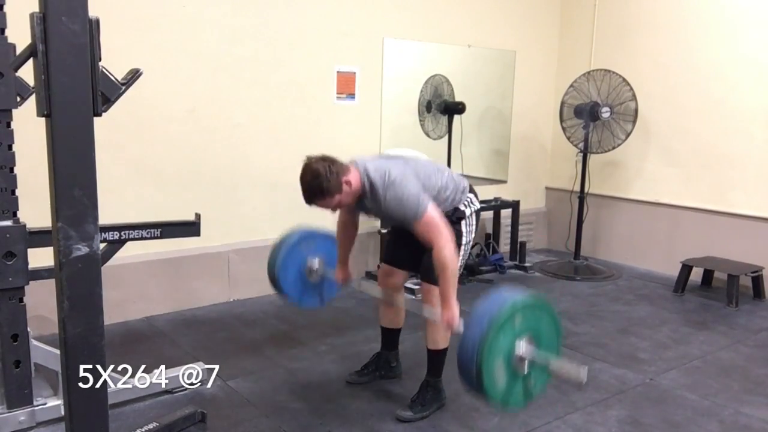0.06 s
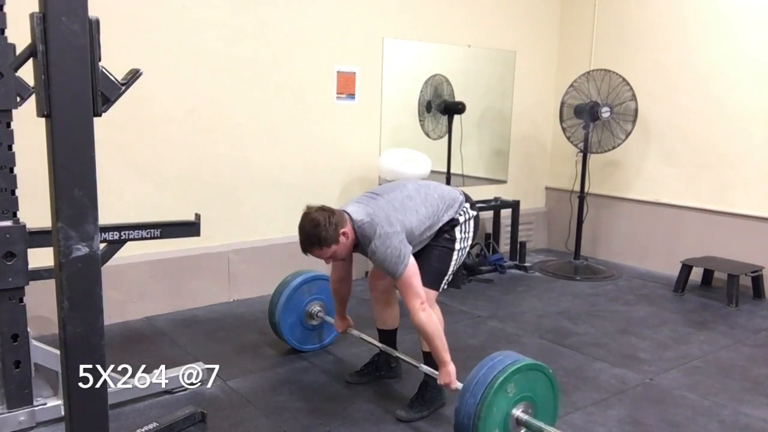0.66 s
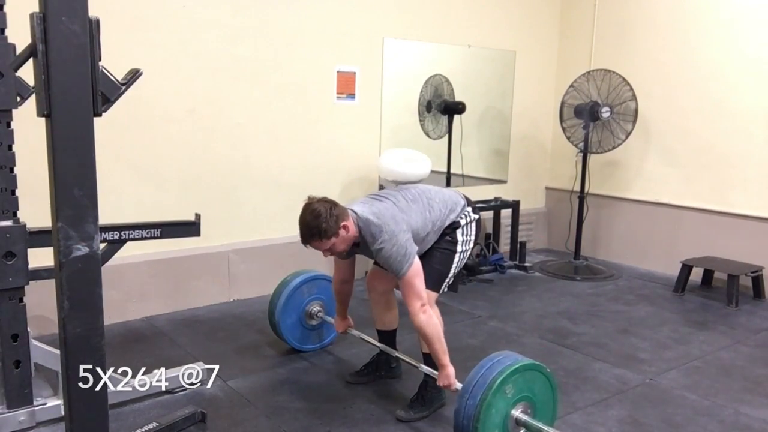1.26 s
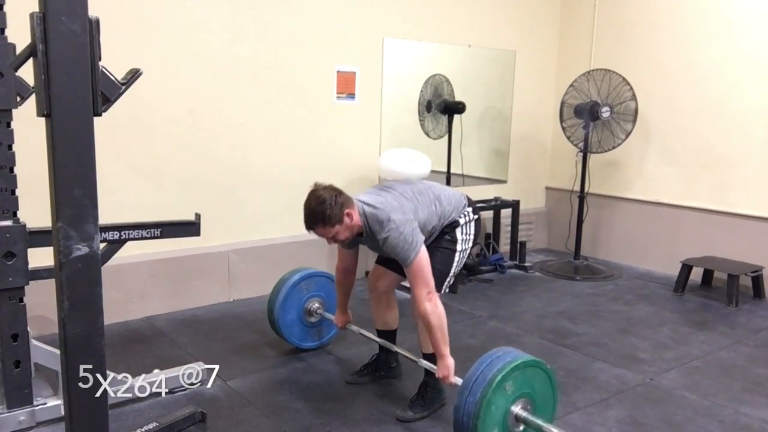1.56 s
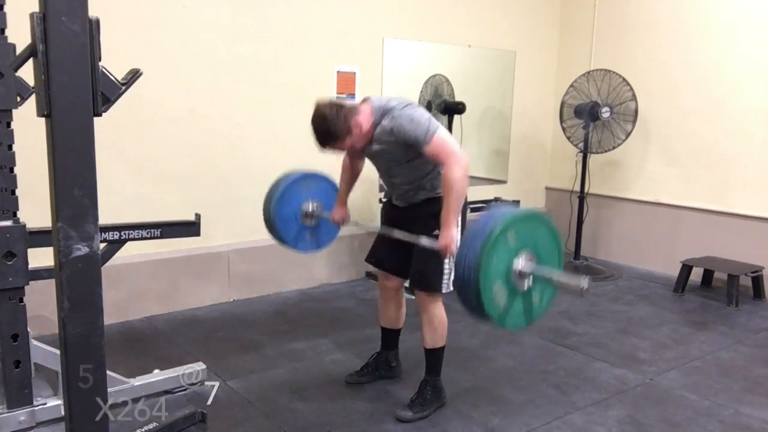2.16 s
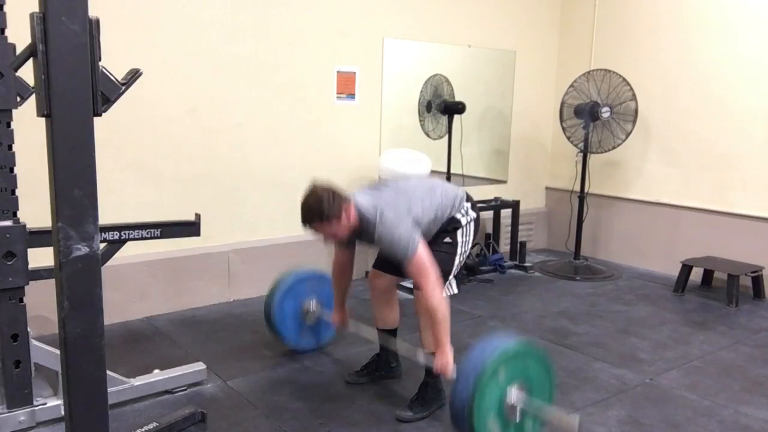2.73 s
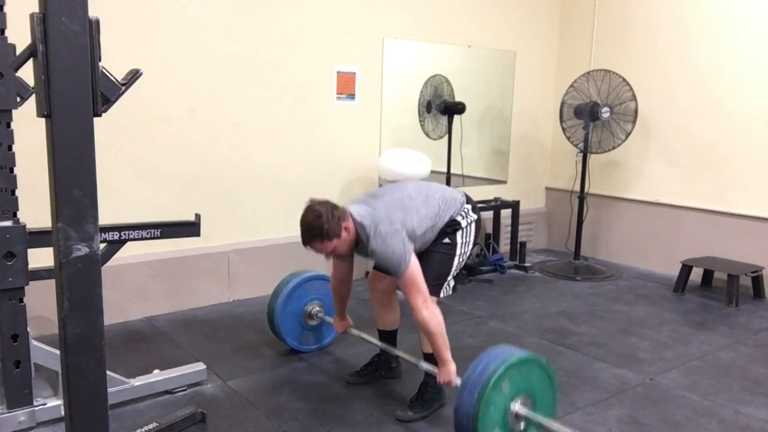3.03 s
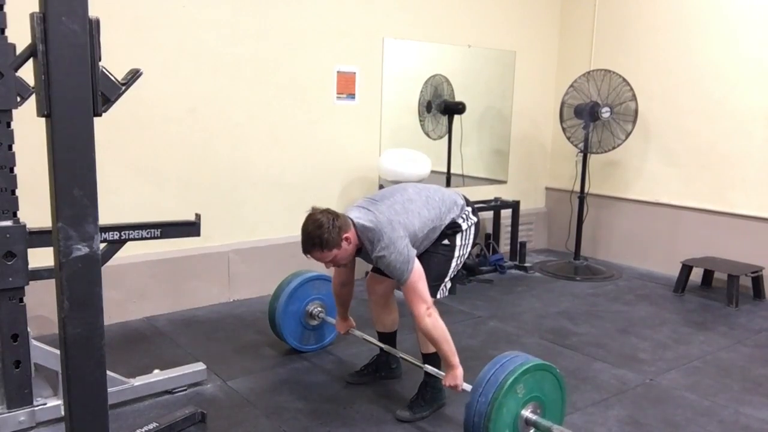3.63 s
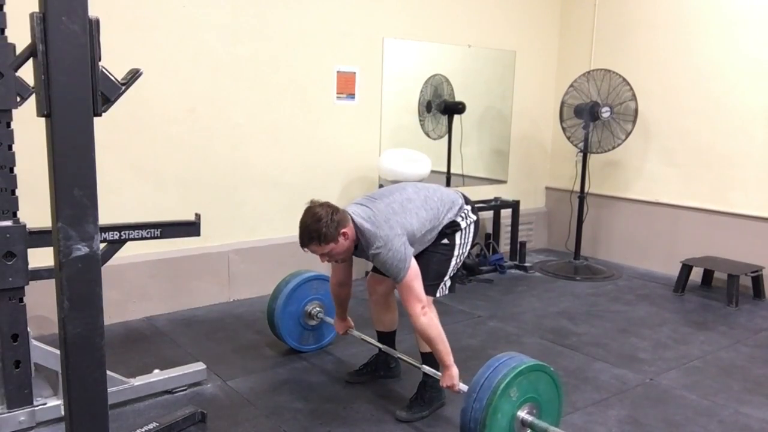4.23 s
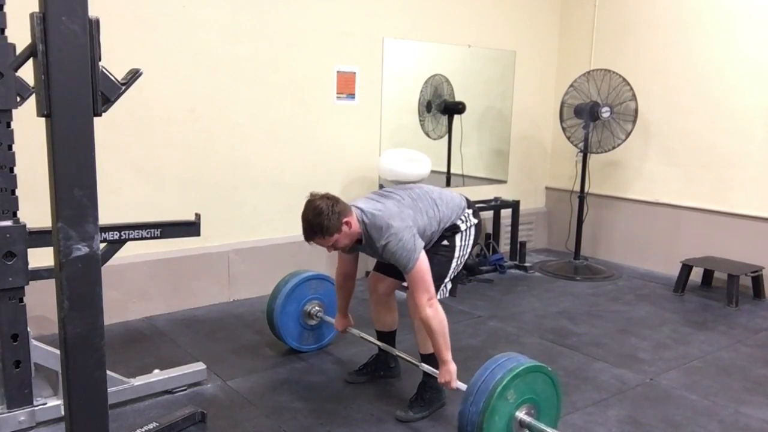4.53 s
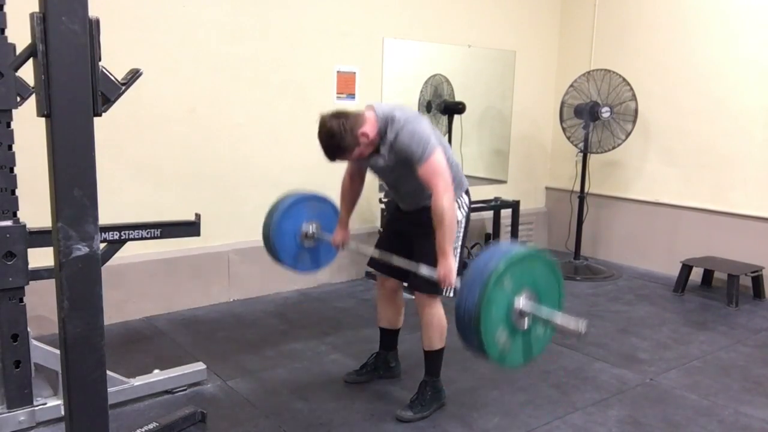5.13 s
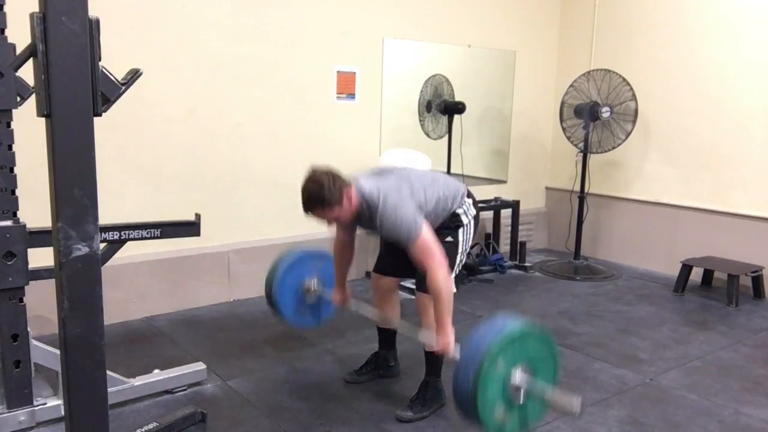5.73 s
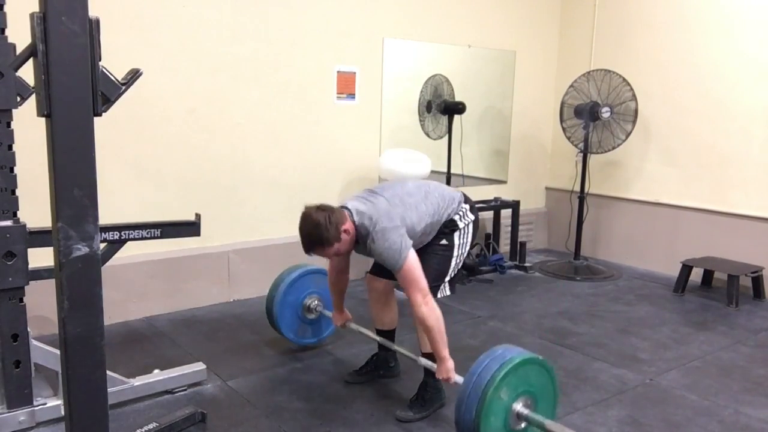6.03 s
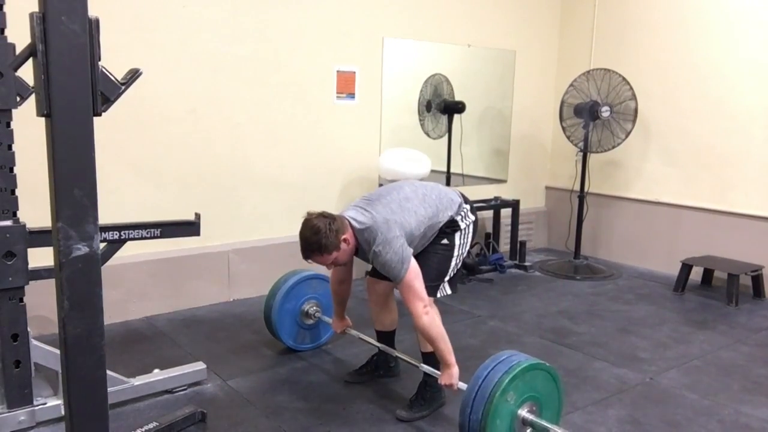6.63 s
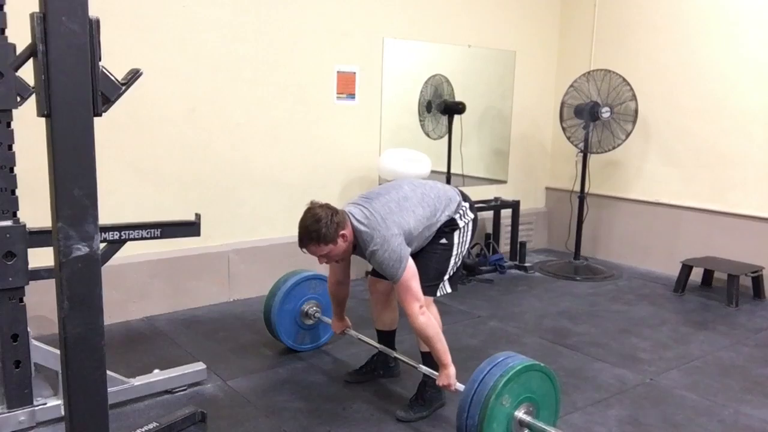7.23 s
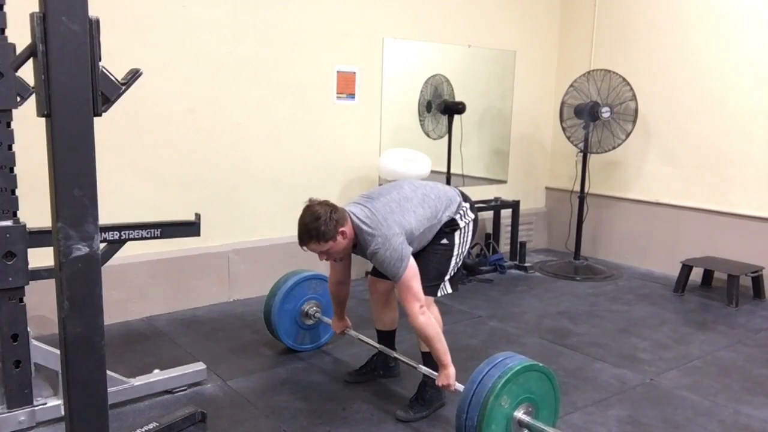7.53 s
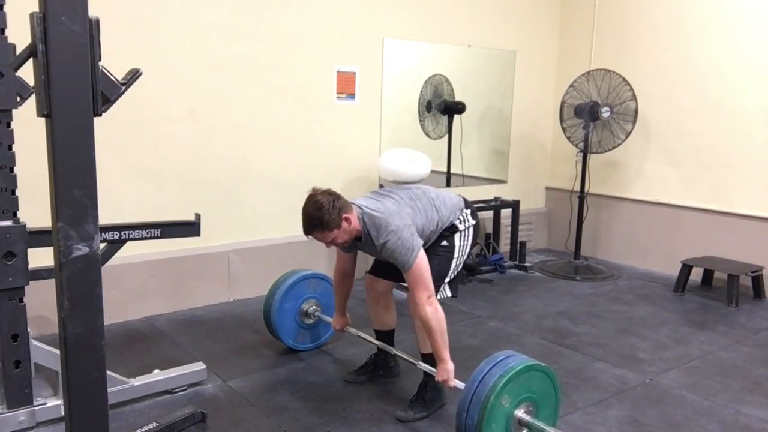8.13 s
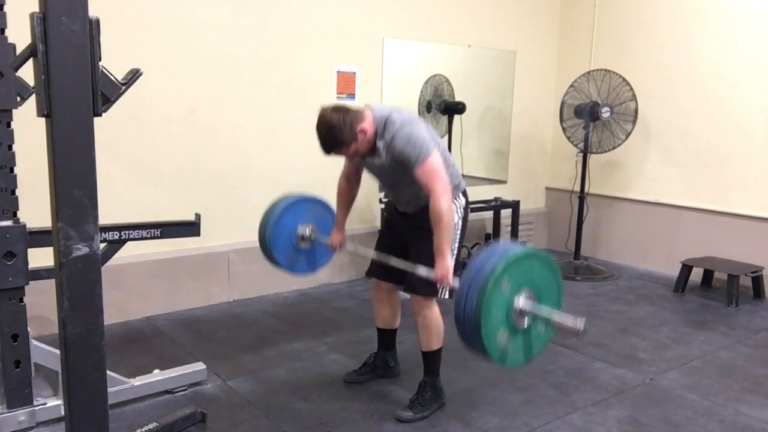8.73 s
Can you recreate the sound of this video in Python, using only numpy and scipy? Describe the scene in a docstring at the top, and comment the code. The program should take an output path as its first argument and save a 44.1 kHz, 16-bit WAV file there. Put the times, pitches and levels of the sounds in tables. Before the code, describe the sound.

After a faint clank, a loaded barbell crashes onto a rubber floor three times, about three seconds apart. Each time the plates clap together, the steel cracks and the rubber thumps, then the bar bounces, rattles to rest and hums low. Between drops, loose plates clank and collars tick lightly. One microphone picks it up in a bare, echoing gym with steady ventilation behind.

```python
"""A faint clank of loose plates, then a barbell crashes onto the rubber floor of a bare, echoing gym.
Three drops: the bumper plates clap together, the steel shaft cracks, the rubber thumps; the bar
bounces, rattles to rest and hums low as it flexes. Between drops it is rowed: plates clank on their
sleeves, collars tick. Ventilation hums behind. One microphone, peak-limited."""
import sys
import numpy as np
from scipy import signal
from scipy.fft import rfft, irfft, next_fast_len
from scipy.io import wavfile
from scipy.ndimage import uniform_filter1d, minimum_filter1d

SR = 44100
rng = np.random.default_rng(int(sys.argv[2]) if len(sys.argv) > 2 else 0)


def inscribe(sig):
    """Save sig as 16-bit PCM at rate SR to the path in sys.argv[1].

    A 1-D sig is mono; a 2-D sig holds one channel per row.
    Samples are clipped to [-1, 1] before scaling.
    """
    pcm = np.round(np.clip(np.atleast_2d(sig).T, -1, 1) * 32767)
    wavfile.write(sys.argv[1], SR, pcm.astype(np.int16))


N = 391592

# room decay: f/Hz, t60/s
GYM_DECAY = [(40, 0.39), (70, 3.1), (160, 1.82), (400, 2.98), (700, 2.49), (1600, 3.32), (3000, 2.45),
             (5500, 1.284), (8000, 0.77), (15000, 0.59)]
# ventilation air spectrum: f/Hz, level/dB
AIR_SPECTRUM = [(20, -30), (45, -9), (66, -7), (86, -14), (120, -11), (150, -9), (230, -15), (370, -13),
                (680, -12), (850, -16), (1400, -16), (2700, -21), (4800, -39), (6500, -41), (9000, -53),
                (15500, -60)]
# fan motor lines: f/Hz, rms level/dB
MOTOR_LINES = [(59.2, -66), (120.3, -59)]
# collar spectrum: f/Hz, level/dB
COLLAR_SPECTRUM = [(500, -19.5), (3500, -4.5), (5300, -3), (6800, 0), (8500, -9.5), (12000, -6),
                   (16000, -20)]
# one plate knocked on its hub: f/Hz, level/dB
HUB_SPECTRUM = [(100, -33.5), (220, -11), (340, -2.5), (480, -3), (680, -3.5), (850, -5.5), (1350, 1.5),
                (2200, -2.5), (2800, -4.5), (3400, -5), (4300, -15.5), (6000, -18), (8000, -29.5),
                (15000, -46)]
# plate stack spectrum: f/Hz, level/dB
STACK_SPECTRUM = [(25, -16.5), (60, 17.5), (110, 4), (170, -0.5), (230, -2), (370, 2.5), (520, -0.5),
                  (900, -1.5), (2200, 0.5), (3400, -1.5), (6000, -11.5), (7800, -20.5), (12000, -26.5),
                  (16000, -34.5)]
# whole-barbell resonances: f/Hz, width/Hz, gain/dB
BARBELL_RESONANCES = [(386, 116, 3), (711, 97, 9), (1034, 38, 3.5), (1558, 65, 4), (1940, 21, -2.5),
                      (2024, 26, 2.5), (2164, 30, 3.5), (2230, 43, 1.5), (2600, 22, -3.5), (3120, 44, 1.5),
                      (3310, 45, 6.5), (3760, 53, 0), (4240, 21, 0), (4370, 87, 8), (4420, 31, -10),
                      (5380, 17, 3), (5710, 90, 7), (6090, 47, 8.5), (9380, 400, 4.5)]
# steel sleeve modes: f/Hz, level/dB, t60/s
SLEEVE_MODES = [(376, -8.5, 0.052), (640, -4.5, .1), (662.3, 19, 0.062), (741, 2.5, 0.16),
                (1602, 2.5, 0.17), (3207, -1, 0.047), (5620, -42, .1), (12840, -33, 0.12)]
# steel shaft modes: f/Hz, level/dB, t60/s
SHAFT_MODES = [(2590, -14.5, 0.095), (2840, 3, 0.087), (3020, 1, 0.2), (3280, 3, 0.14), (3773, 4, 0.097),
               (4150, -1.5, 0.14), (4530, -8.5, 0.18), (4690, -9.5, 0.28), (5030, -21, 0.43),
               (5570, -9, 0.33)]
# collars touching plates: t/s, level/dB
COLLAR_TICKS = [(1.360, -66), (2.463, -69), (4.453, -62.5), (5.403, -63), (5.532, -63), (8.039, -58.5)]
# plates shifting on sleeves: t/s, level/dB, tilt/(dB/oct), rattle/s, sleeve ring/dB
PLATE_CLANKS = [(-.09, -40, -1, 0.026, -50), (2.394, -45.5, -2, 0.059, -60.5),
                (2.461, -37.5, 0, 0.011, -56), (4.418, -43.5, -3, 0.013, -55),
                (5.422, -48.5, -1.5, 0.047, -60), (5.539, -40, -2, 0.069, -47),
                (8.047, -40, -1, 0.02, -48.5), (8.262, -56, -9.5, 0.0054, -45.5)]
# drops: t/s, level/dB, far-end lag/s, first flight/s, flex level/dB, flex t60/s
BAR_DROPS = [(0.298, -19.5, .030, .258, -21, 3.37), (2.833, -18.5, .021, .277, -33, 3),
             (5.899, -18.5, .025, .270, -22.5, 3.2)]
# contacts within a drop: level re drop/dB, tilt/(dB/oct), rattle/s
RIM_TOUCH, NEAR_SLAM, FAR_SLAM = (-11.5, -1.1, .0065), (0, 1.26, .017), (-1.84, -2.3, .025)
NEAR_BOUNCE, FAR_BOUNCE = (-16, 2.54, .023), (-15, .3, .025)


def amp(db):
    return 10 ** (np.asarray(db) / 20)


def time_axis(length_s):
    return np.arange(int(length_s * SR)) / SR


def log_interp(points, hz):
    """(f/Hz, value) points read on a log frequency axis."""
    knots_hz, values = np.transpose(points)
    return np.interp(np.log(hz + 1), np.log(knots_hz), values)


def add(track, at_s, x):
    """Mix x into the track from at_s on."""
    start = round(at_s * SR)
    x = x[max(-start, 0):N - start]
    track[max(start, 0):][:len(x)] += x


def filtered(x, gain):
    """Zero-phase filter by gain(hz)."""
    size = next_fast_len(len(x) + SR // 2)
    return irfft(rfft(x, size) * gain(np.fft.rfftfreq(size, 1 / SR)), size)[:len(x)]


def settling(first_s, shrink, repeats):
    """Contact times from 0, gaps shrinking geometrically."""
    return np.append(0, np.cumsum(first_s * shrink ** np.arange(repeats)))


def steel_ring(modes, size=4096):
    """Decaying steel modes, unit energy; strengths and phases vary per blow."""
    t = np.arange(size) / SR
    ring = sum(amp(db + rng.normal(0, 2) - 60 * t / t60_s) * np.sin(2 * np.pi * (hz * t + rng.random()))
               for hz, db, t60_s in modes)
    ring *= np.minimum(t / .002, 1) * np.minimum((t[-1] - t) / .03, 1)
    return ring / np.linalg.norm(ring)


def struck(spectrum, ripple_db, tilt_db_oct, size=4096):
    """A part's unit-energy response to one contact, coloured by the barbell's modes."""
    hz = np.fft.rfftfreq(size, 1 / SR)
    peaks_db = sum(db / (1 + (2 * (hz - centre_hz) / width_hz) ** 2)
                   for centre_hz, width_hz, db in BARBELL_RESONANCES)
    fine_db = np.interp(hz, np.linspace(0, SR / 2, len(ripple_db)), ripple_db)
    fine_db *= hz / (hz + 1800)  # weak modes crowd the treble
    octaves = np.log2(np.maximum(hz, 250) / 1000)
    level_db = log_interp(spectrum, hz) + peaks_db + fine_db + tilt_db_oct * octaves
    cepstrum = irfft(np.log(amp(level_db)))
    cepstrum[1:size // 2] *= 2  # fold to minimum phase: fastest attack
    cepstrum[size // 2 + 1:] = 0
    response = irfft(np.exp(rfft(cepstrum)))
    return response / np.linalg.norm(response)


def room_rattle(rattle_s, direct_db, crisp_db, early_db=-1, early_t60_s=.23, contacts_per_s=2200):
    """Hard contacts in the gym: direct sound, near walls, then a tail that loses treble first."""
    hz, frames_s, noise = signal.stft(rng.standard_normal(5 * SR // 2), SR, nperseg=512)
    decay = amp(-60 * frames_s / log_interp(GYM_DECAY, hz)[:, None])
    room = signal.istft(noise * decay, nperseg=512)[1]
    t = np.arange(len(room)) / SR
    room *= 1 + amp(early_db - 60 * t / early_t60_s)
    size = SR // 3
    force = amp(-20 * t[:size] / rattle_s) * (1 - np.exp(-t[:size] / (.12 * rattle_s)))
    room[:size] *= np.sqrt(np.cumsum(force ** 2) / np.sum(force ** 2))  # room fills during the rattle
    contacts = rng.random(size) < contacts_per_s / SR
    rattle = force * contacts * amp(4 * rng.standard_normal(size)) * rng.choice([-1, 1], size)
    rattle /= np.linalg.norm(rattle) + 1e-12
    treble = np.diff(rattle, prepend=0)  # direct path is brightest
    room[:size] += amp(direct_db) * rattle + amp(crisp_db) * treble
    return room


def ventilation(air_rms_db=-53.3):
    """Steady moving air plus motor hum."""
    t = np.arange(N) / SR
    air = filtered(rng.standard_normal(N), lambda hz: amp(log_interp(AIR_SPECTRUM, hz)))
    air /= np.sqrt(np.mean(air ** 2))
    hum = sum(amp(db) * np.sqrt(2) * np.sin(2 * np.pi * hz * t) for hz, db in MOTOR_LINES)
    return amp(air_rms_db) * air + hum


def collar_ticks(ripple_db, rattle_s=.014):
    """Collars tick against the plates as the bar is pulled and turned."""
    out = np.zeros(N)
    for at_s, db in COLLAR_TICKS:
        rattle = room_rattle(rattle_s, direct_db=28, crisp_db=15)
        collar = struck(COLLAR_SPECTRUM, ripple_db, tilt_db_oct=-.5)
        add(out, at_s, amp(db) * signal.oaconvolve(rattle, collar))
    return out


def plate_clanks(ripple_db, direct_ring_gain_db=38):
    """Loose plates knock on the sleeves, which ring."""
    out = np.zeros(N)
    for at_s, db, tilt_db_oct, rattle_s, ring_db in PLATE_CLANKS:
        sleeve = amp(ring_db) * steel_ring(SLEEVE_MODES)
        hub = amp(db) * struck(HUB_SPECTRUM, ripple_db, tilt_db_oct)
        rattle = room_rattle(rattle_s, direct_db=29.5, crisp_db=20)
        add(out, at_s, signal.oaconvolve(rattle, hub + sleeve))
        add(out, at_s, amp(direct_ring_gain_db) * sleeve)
    return out


def bar_flex(low_hz=59.2, high_hz=70, high_db=-9, high_t60_s=1.86, rise_s=.053):
    """Two close bending modes beat from the first bounce on; the lower lasts longer."""
    out, t = np.zeros(N), time_axis(3)
    swell = 1 - np.exp(-t / rise_s)
    high = amp(high_db - 60 * t / high_t60_s) * np.sin(2 * np.pi * high_hz * t)
    for at_s, _, _, flight_s, db, t60_s in BAR_DROPS:
        low = amp(-60 * t / t60_s) * np.sin(2 * np.pi * low_hz * t)
        add(out, at_s + flight_s, amp(db) * swell * (low + high))
    return out


def floor_thumps(hz=64.6, rise_s=.02, delay_s=.0074, gain_db=7, bounce_loss_db=6):
    """Rubber gives and springs back on landing and first bounce; bar whip repeats the thud."""
    out, t = np.zeros(N), time_axis(.2)
    thud = (t / rise_s * np.exp(1 - t / rise_s)) ** 2 * np.sin(2 * np.pi * hz * t)
    whips_s = settling(first_s=.089, shrink=.68, repeats=3)
    for at_s, drop_db, _, flight_s, _, _ in BAR_DROPS:
        for contact_s, db in [(at_s, drop_db), (at_s + flight_s, drop_db - bounce_loss_db)]:
            for whip_s, loss_db in zip(whips_s, (0, 2, 6, 12)):
                add(out, contact_s + delay_s + whip_s, amp(db + gain_db - loss_db) * thud)
    return out


def clap_events(rim_lead_s=.0055, loss_db=.87, dull_db_oct=.5):
    """Rim, near stack and far stack land in turn; bounces get faster, softer, duller."""
    for at_s, drop_db, lag_s, flight_s, _, _ in BAR_DROPS:
        landing = [(-rim_lead_s, RIM_TOUCH), (0, NEAR_SLAM), (lag_s, FAR_SLAM)]
        for delay_s, (db, tilt_db_oct, rattle_s) in landing:
            yield at_s + delay_s, drop_db + db, tilt_db_oct, rattle_s
        for k, bounce_s in enumerate(settling(flight_s, shrink=.48, repeats=4)[1:]):
            for delay_s, (db, tilt_db_oct, rattle_s) in [(0, NEAR_BOUNCE), (lag_s, FAR_BOUNCE)]:
                yield (at_s + bounce_s + delay_s, drop_db + db - k * loss_db,
                       tilt_db_oct - k * dull_db_oct, rattle_s)


def landings(ripple_db, ring_db=-40.5, direct_ring_gain_db=32, crack_gain_db=29):
    """Plates clap; play in the sleeves rings them about equally each time. One shaft crack per drop."""
    out = np.zeros(N)
    for at_s, db, tilt_db_oct, rattle_s in clap_events():
        sleeve = amp(ring_db) * steel_ring(SLEEVE_MODES)
        stack = amp(db) * struck(STACK_SPECTRUM, ripple_db, tilt_db_oct)
        rattle = room_rattle(rattle_s, direct_db=31, crisp_db=19)
        add(out, at_s, signal.oaconvolve(rattle, stack + sleeve))
        add(out, at_s, amp(direct_ring_gain_db) * sleeve)
    for at_s, db, *_ in BAR_DROPS:
        add(out, at_s, amp(db + crack_gain_db) * steel_ring(SHAFT_MODES, size=12000))
    return out


def scene():
    """All sources at one microphone, both channels alike."""
    ripple_db = 2.2 * rng.standard_normal(500)  # the barbell's weak modes
    mono = landings(ripple_db) + plate_clanks(ripple_db) + collar_ticks(ripple_db)
    mono += floor_thumps() + bar_flex() + ventilation()
    return np.array([mono, mono])


def record(dry, ceiling=.5, window_samples=200, cutoff_hz=15800):
    """Fast peak limiter, then brick-wall low-pass."""
    needed_gain = ceiling / np.maximum(np.abs(dry[0]), ceiling)
    gain = uniform_filter1d(minimum_filter1d(needed_gain, window_samples), window_samples)
    mono = filtered(dry[0] * gain, lambda hz: hz < cutoff_hz)
    return np.array([mono, mono])


dry = scene()
out = record(dry)
inscribe(out)
```